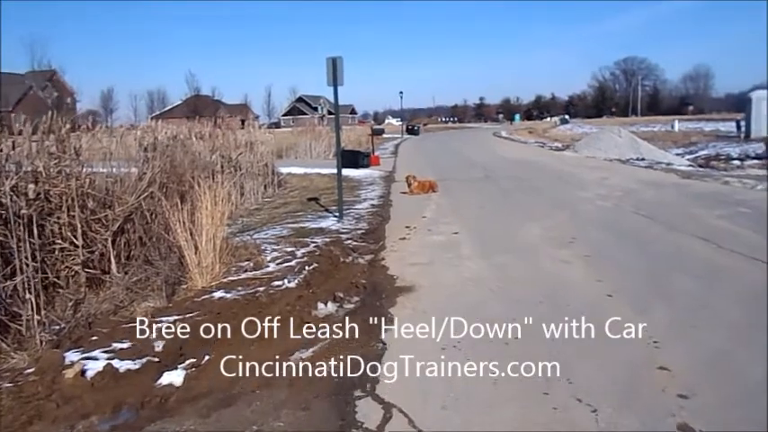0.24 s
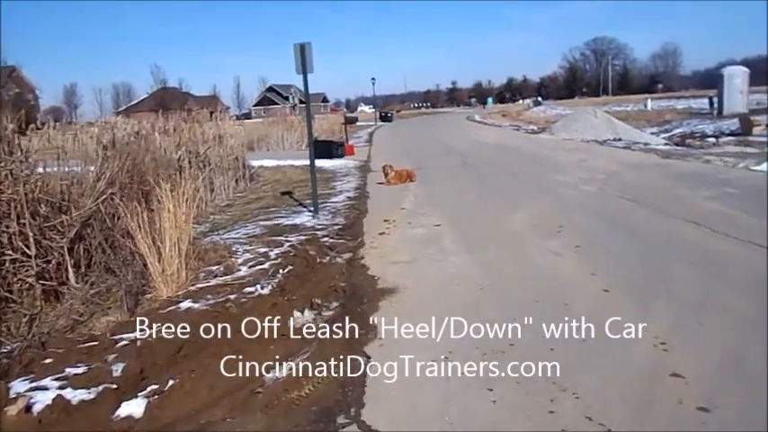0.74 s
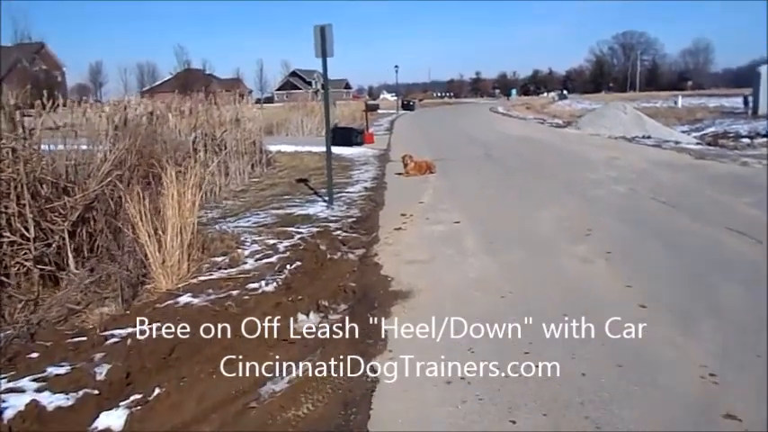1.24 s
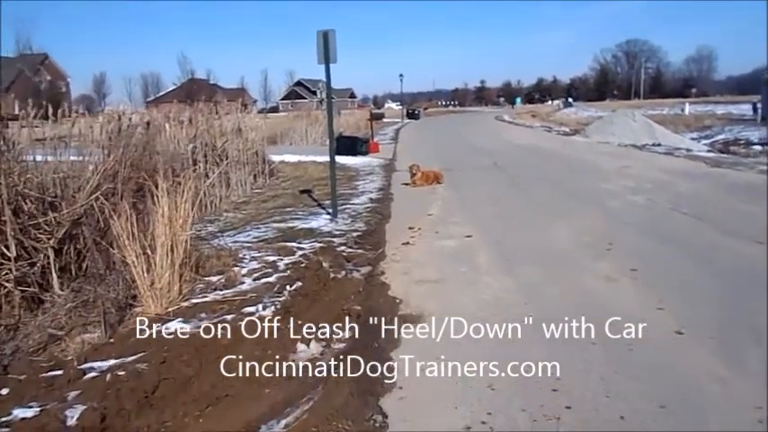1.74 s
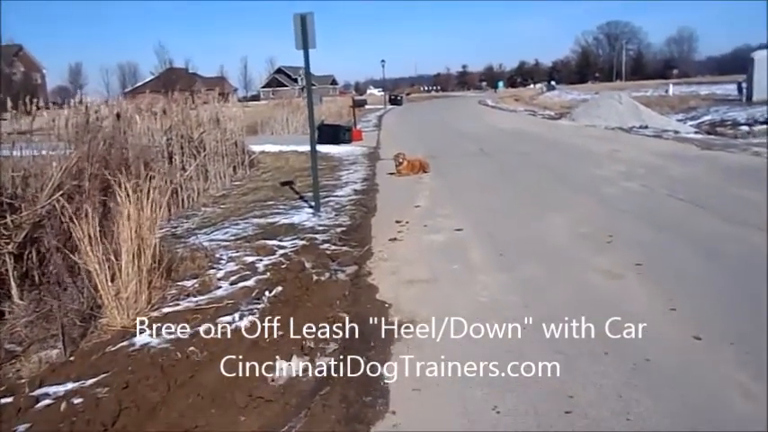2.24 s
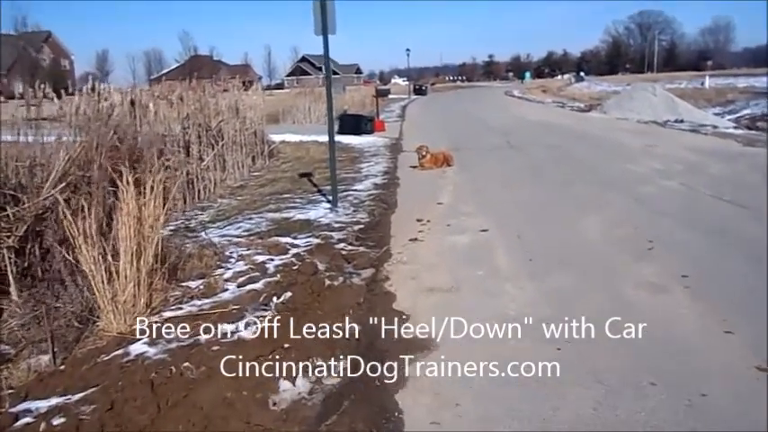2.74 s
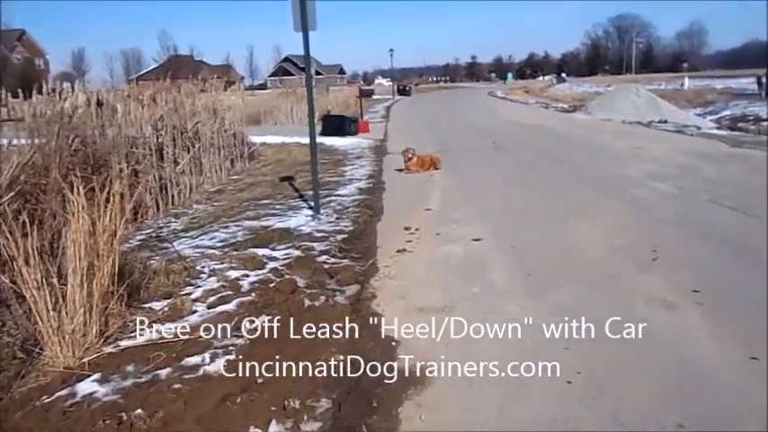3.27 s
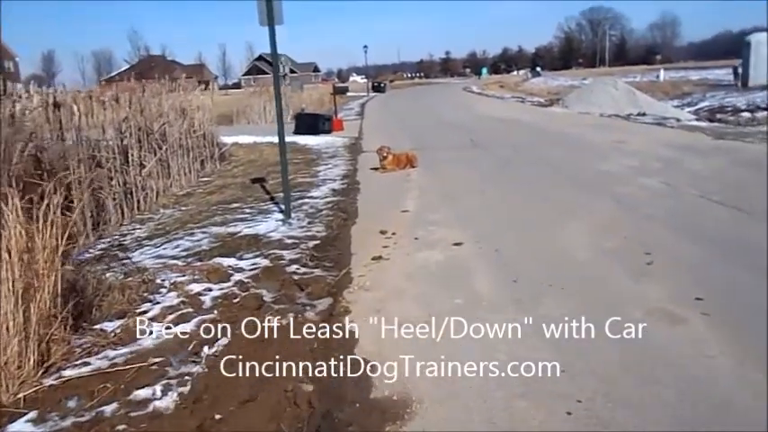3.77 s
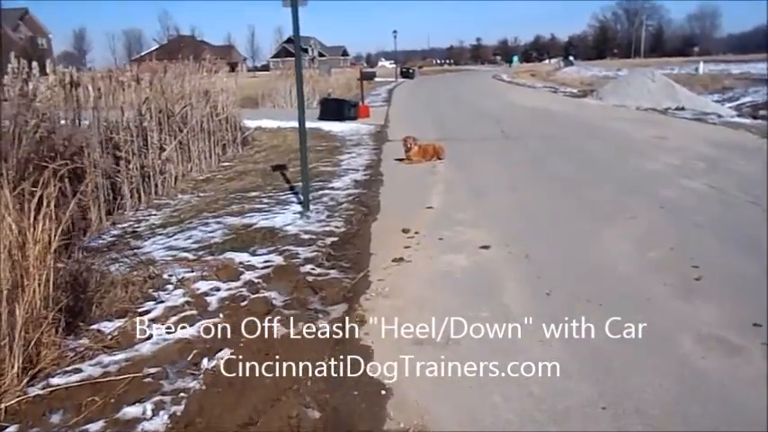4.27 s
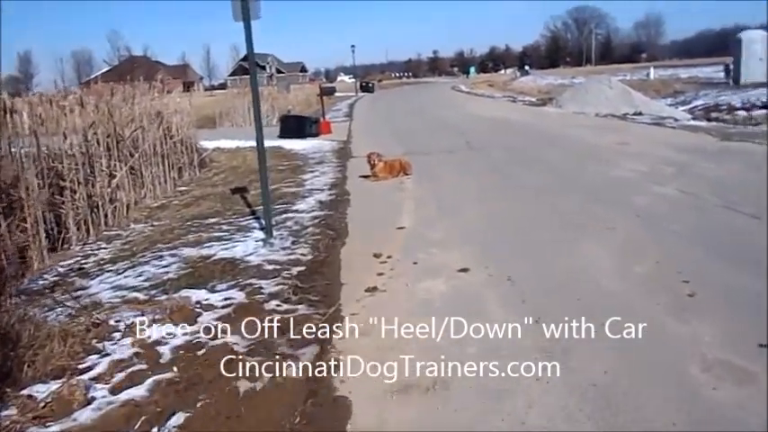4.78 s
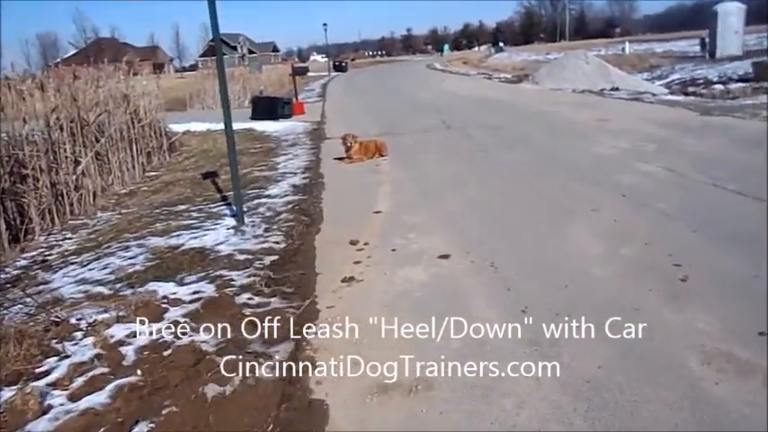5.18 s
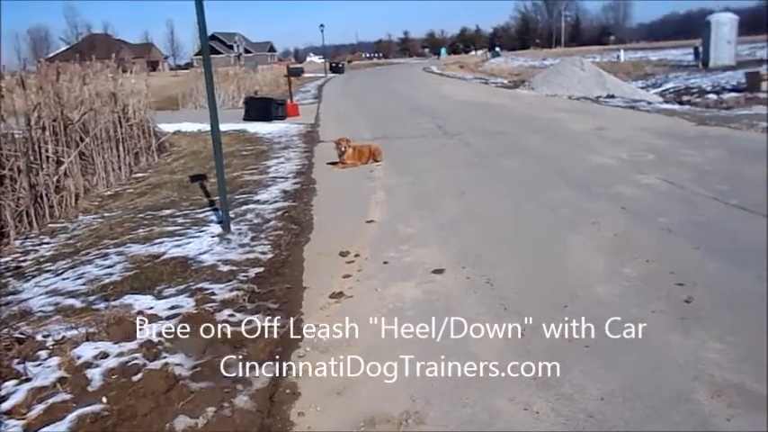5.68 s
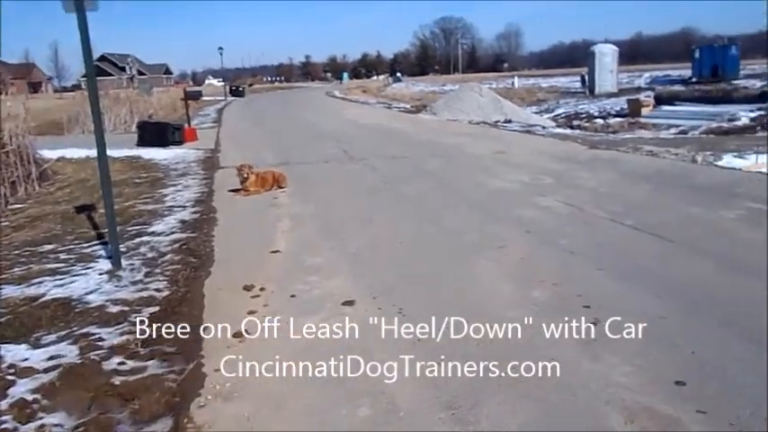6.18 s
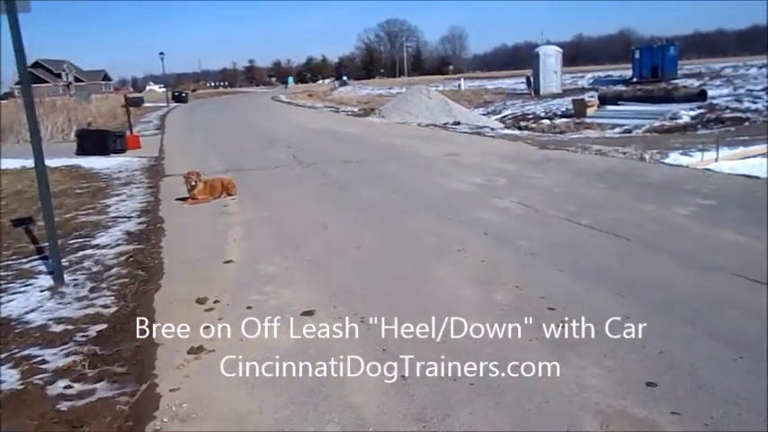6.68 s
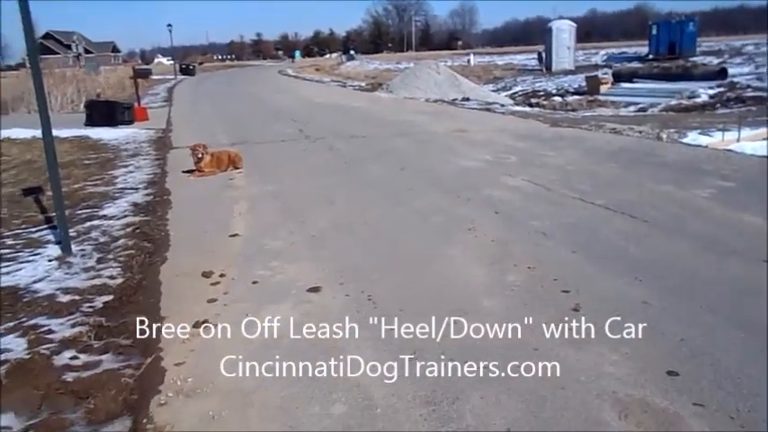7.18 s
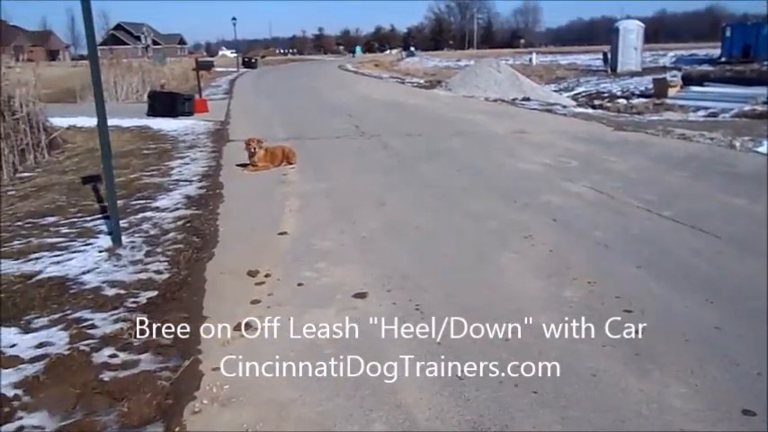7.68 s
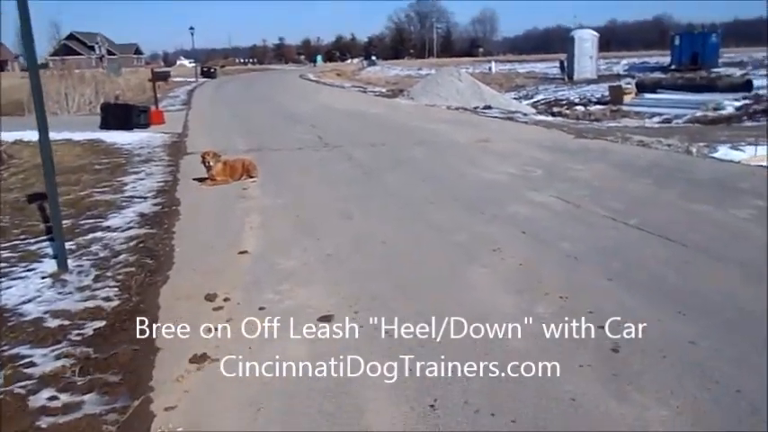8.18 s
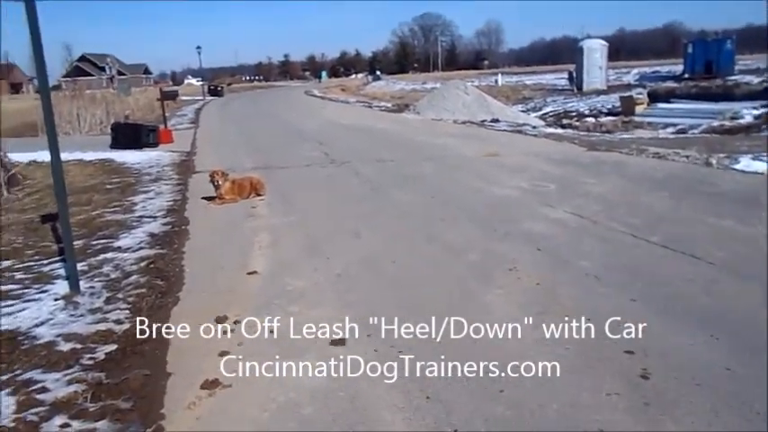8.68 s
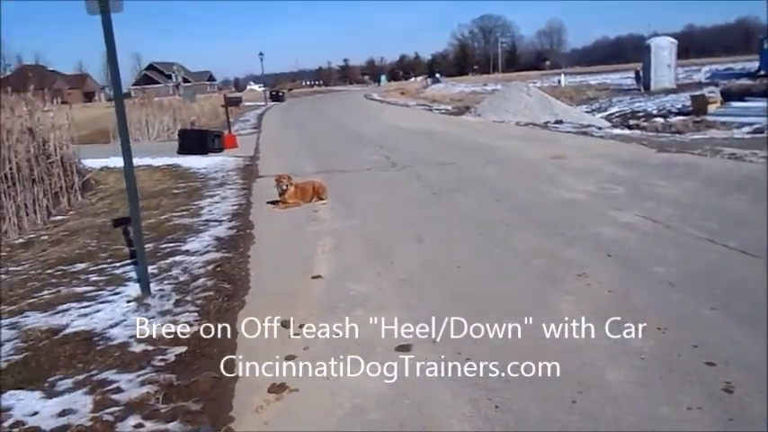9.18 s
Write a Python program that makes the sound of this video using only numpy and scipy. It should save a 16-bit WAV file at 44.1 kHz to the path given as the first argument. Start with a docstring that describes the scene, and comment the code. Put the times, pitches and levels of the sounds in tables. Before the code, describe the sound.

Outdoors on an open country road, a car's soft tyre roar recedes over steady airy wash and two low, throbbing engine hums far off. Close to a small, slightly dull microphone, someone shuffles slowly on gritty asphalt: irregular scrapes, dull sole thuds and sharp pebble snaps. A tiny bird whistle comes past the middle, then the heaviest step lands near eight seconds.

```python
"""A road in open country: a car rolls away, its tyre roar fading over a steady wash of air, while
two far engines hum and beat against each other. Close by, the holder of a small camera shuffles
slowly over gritty asphalt: grit grinds as noise grains, the sole thuds and single stones snap as
short rings. Later a bird gives one faint whistle, a rising sine. A small microphone hears it all."""
import sys
import numpy as np
from scipy import signal
from scipy.io import wavfile
from scipy.ndimage import uniform_filter1d

SR = 44100
rng = np.random.default_rng(int(sys.argv[2]) if len(sys.argv) > 2 else 0)


def digitize_waveform(pressure):
    """Quantize a signal to 16-bit integers and store it at the path in sys.argv[1].

    Rows of a 2-D input are taken as channels; values are limited to [-1, 1].
    """
    field = np.atleast_2d(pressure).T
    bounded = np.clip(field, -1, 1)
    quanta = np.round(bounded * 32767).astype(np.int16)
    wavfile.write(sys.argv[1], SR, quanta)


N = 415457  # samples

# short slides of the sole over loose grit: middle t/s, nominal length t/s, peak level/dB, fineness (0-1)
SLIDES = [(0.364, 0.08, -56, 0.4), (1.033, 0.024, -30.5, 0.01), (1.066, 0.021, -39.5, 0.1),
          (1.1, 0.05, -44.5, 0), (1.724, 0.03, -50.5, 0.6), (1.844, 0.13, -57, 0), (2.452, 0.024, -32, 0.6),
          (2.492, 0.086, -48, 0.45), (3.08, 0.039, -55, 0.6), (3.229, 0.16, -51.5, 0.04),
          (3.351, 0.053, -54.5, 0.1), (3.848, 0.025, -47.5, 0.3), (3.898, 0.044, -44.5, 0.04),
          (3.945, 0.052, -50, 0), (4.015, 0.044, -46, 0), (4.743, 0.098, -65, 0.3),
          (5.236, 0.037, -46, 0.02), (5.344, 0.088, -39.5, 0.04), (6.618, 0.14, -56, 0.2),
          (6.918, 0.035, -51, 0.9), (6.968, 0.035, -54, 1.0), (7.326, 0.014, -40, 0.9),
          (7.361, 0.022, -38, 0.4), (7.407, 0.046, -44, 0.3), (7.996, 0.061, -38, 0.06),
          (8.061, 0.058, -44.5, 0), (8.257, 0.048, -51.5, 0.76), (8.438, 0.033, -56, 0.5),
          (8.501, 0.023, -55.5, 1), (8.616, 0.015, -53, 0.1), (8.654, 0.031, -57, 0.3),
          (8.711, 0.019, -51, 1.0), (8.855, 0.035, -54.5, 1)]
# colour of the coarse grit, also of the stone debris: f/Hz, relative level per Hz/dB
COARSE_COLOUR = [(300, -23.5), (700, 0.5), (1300, 2.5), (2200, -1.5), (3400, 2.5), (5500, -2),
                 (6500, -20.5), (7100, -30), (11000, -29)]


def amp(db):
    """Amplitude for a level in dB."""
    return 10 ** (np.asarray(db) / 20)


def evened(x):
    """Bring a signal to an rms of 1."""
    return x / np.sqrt(np.mean(x ** 2) + 1e-20)


def spectrum(points, hz):
    """Amplitude at each frequency, drawn between (f/Hz, level/dB) points on a log frequency axis."""
    f, db = np.transpose(points)
    return amp(np.interp(np.log(hz + 1), np.log(f + 1), db))


def add(mix, s, sound):
    """Lay a sound into the mix from s seconds on, cut at the end of the mix."""
    part = mix[round(s * SR):][:len(sound)]
    part += sound[:len(part)]


def wash(points, patchy_db):
    """Noise of a given colour whose level drifts in patches over time and frequency."""
    frames, hz = N // 512 + 5, np.fft.rfftfreq(2048, 1 / SR)
    real, imaginary, patches = rng.standard_normal((frames, 1025, 3)).T
    patches = uniform_filter1d(patches, size=16, axis=0)  # smooth over frequency
    patches = evened(uniform_filter1d(patches, size=6, axis=1))  # smooth over time
    level = spectrum(points, hz)[:, None] * amp(patchy_db * patches)
    noise = signal.istft((real + 1j * imaginary) * level, nperseg=2048, noverlap=1536)[1]
    return evened(noise[:N])


def coloured(x, points):
    """Causal, minimum-phase colour, so that clicks keep a sharp front."""
    log_gain = np.log(spectrum(points, abs(np.fft.fftfreq(4096, 1 / SR))))
    response = np.exp(np.conj(signal.hilbert(log_gain)))
    taps = np.fft.ifft(response).real[:1024]
    return signal.oaconvolve(x, taps)[:len(x)]


def blurred(hz, width, steady):
    """A tone whose level and phase wander within a band of width Hz, around a steady share."""
    decay = np.exp(-np.pi * width / SR)
    real, imaginary = rng.standard_normal((N, 2)).T
    wander = signal.lfilter([1], [1, -decay], real + 1j * imaginary)
    wander /= np.sqrt(np.mean(abs(wander) ** 2))
    carrier = np.exp(2j * np.pi * np.cumsum(hz * np.ones(N)) / SR)
    return evened((carrier * (steady + wander)).real)


def ring(hz, db, cycles, turn, lead):
    """A quick rise and a dying ring of a few cycles, its peak near lead seconds."""
    u = np.maximum((np.arange(2400) / SR - lead) * hz / cycles + 0.57, 0)
    shape = (1 - np.exp(-2.2 * u)) ** 2 * np.exp(-1.3 * u)
    return amp(db) * shape / shape.max() * np.cos(2 * np.pi * (cycles * u + turn))


def road():
    """Tyre roar falling as 1/distance while the car rolls away, over the steady wash of open country."""
    # colours of the tyres and of the open country: f/Hz, relative level per Hz/dB
    tyre_colour = [(24, -72), (40, -24), (100, -10.5), (209, -1), (405, -14.5), (500, -23.5), (822, -14),
                   (1520, -13.5), (2320, -26), (2940, -22.5), (6880, -52.5), (11300, -57), (14700, -91),
                   (22000, -120)]
    air_colour = [(20, -39), (40, -10.5), (80, -3), (230, -2.5), (400, -6), (800, -15), (1200, -11),
                  (1900, -24), (2400, -22), (2950, -19.5), (4400, -30.5), (5500, -27.5), (6400, -35.5),
                  (7000, -59), (11000, -49)]
    start_m, speed_m_per_s = 26.3, 10.2
    car_db, air_db = -39, -45.5  # rms; the car's at its starting distance
    distance_m = start_m + speed_m_per_s * np.arange(N) / SR
    car = amp(car_db) * start_m / distance_m
    return car * wash(tyre_colour, patchy_db=1.0) + amp(air_db) * wash(air_colour, patchy_db=1.0)


def engine():
    """The lowest firing orders of two engines, blurred by distance and moving air, and a faint whine."""
    # far engine that hunts a little and settles, its firing rate: t/s, f/Hz
    firing_rate = [(0, 61.5), (1.2, 61), (1.8, 57.4), (2.4, 58.2), (3, 59.6), (3.5, 57.4), (4.05, 58.6),
                   (4.6, 56.3), (7.3, 55.6), (9.42, 56.2)]
    # firing orders of the hunting and of the steady engine: multiple, rms level/dB, blur f/Hz
    hum_orders = [(1, -62, 1.0), (2, -59, 2.2), (3, -52, 2.1)]
    drone_orders = [(2, -58, 2.0), (3, -53, 2.7)]
    steady_hz = 58.5  # firing rate of the second engine
    whine_hz, whine_width_hz, whine_db = 1132, 21, -58.5
    hz = np.interp(np.arange(N) / SR, *np.transpose(firing_rate))
    hum = sum(amp(db) * blurred(k * hz, width, steady=1.76) for k, db, width in hum_orders)
    drone = sum(amp(db) * blurred(k * steady_hz, width, steady=1.4) for k, db, width in drone_orders)
    whine = amp(whine_db) * blurred(whine_hz, whine_width_hz, steady=0)
    return hum + drone + whine


def slide(size):
    """Level of one slide: it bites quickly and eases off slowly."""
    return np.sin(np.pi * np.linspace(0, 1, size) ** 0.64) ** 2


def grit():
    """Many small grains of very unequal size over a sandy hiss, swelling with each slide."""
    # colour of the finest grit: f/Hz, relative level per Hz/dB
    sand_colour = [(1500, -27), (3000, -16), (4200, -1), (5700, 5.5), (6500, -20), (7100, -15),
                   (11000, -20.5)]
    loose_db = -63  # coarse grit that keeps shifting between the slides
    coarse, fine = np.full(N, amp(loose_db)), np.zeros(N)
    for s, length, db, fineness in SLIDES:
        swell = amp(db) * slide(round(1.49 * length * SR))
        fineness = np.clip(fineness, 0, 1)
        add(coarse, s - 0.63 * length, np.sqrt(1 - fineness) * swell)
        add(fine, s - 0.67 * length, np.sqrt(fineness) * swell)
    when, size, sign, hiss = rng.random((N, 4)).T
    struck = when < 1200 / SR  # 1200 grains per second on average
    grains = struck * amp(-3.0 * np.log(1 - size + 0.003)) * np.sign(sign - .5)
    rub = evened(grains) + 0.4 * (hiss - .5)
    # the fine grit takes the same rub backwards
    coarse_rub, fine_rub = coloured(rub, COARSE_COLOUR), coloured(rub[::-1], sand_colour)
    return coarse * evened(coarse_rub) + fine * evened(fine_rub)


def thuds():
    """Soft pushes and short rings of the sole as weight lands on it or drags it."""
    # thuds of the sole: t/s, f/Hz, peak level/dB, length in cycles
    thud_rows = [(.25, 825, -31, 3.7), (0.26, 179.3, -29, 4.14), (2.453, 352, -30, 1.13),
                 (2.465, 470, -27.5, 1.4), (5.245, 450, -32.5, 1.4), (5.339, 534, -32, 1.27),
                 (7.968, 480, -17.5, 0.83), (7.974, 300, -18.5, 0.92), (7.995, 416, -28.5, 1.8),
                 (8.044, 410, -37, 0.9), (8.222, 1517, -40, 6.5), (8.26, 1515, -42.5, 13)]
    out, lead = np.zeros(N), 15e-3  # s
    for (s, hz, db, cycles), turn in zip(thud_rows, rng.random(len(thud_rows))):
        add(out, s - lead, ring(hz, db, cycles, turn, lead))
    return out


def chips():
    """Small chips snap at random inside each slide: louder in a hard slide, higher in fine grit."""
    most, per_s = 12, 70  # most chips in one slide; mean rate over its nominal length
    base_db, follow, spread_db, knock_db = -34, .4, 10, -7  # follow: dB per dB of slide level
    crack_hz, fine_hz, crack_spread_hz = 4000, 900, 1500
    sole_hz, sole_spread_hz = 1250, 1100
    s, length, db, fineness = np.transpose(SLIDES)[:, :, None]
    draws = rng.random((len(SLIDES), most, 5))
    kept, when, size, pitch, place = np.moveaxis(draws, 2, 0)
    crack_db = base_db + follow * (db - np.mean(db)) + spread_db * (size - .5)
    # same columns as the clear snaps
    rows = np.array([s + length * (when - .5),
                     sole_hz + sole_spread_hz * (place - .5),
                     crack_db + knock_db,
                     crack_hz + fine_hz * fineness + crack_spread_hz * (pitch - .5),
                     crack_db])
    return list(rows[:, kept < per_s * length / most].T)


def stones():
    """Each snap knocks the sole, cracks the stone in two partials, and scatters a short spray of debris."""
    # stones that snap clearly, levels ahead of the partials' offsets and the body colour:
    # t/s, sole knock f/Hz, knock level/dB, stone crack f/Hz, crack level/dB
    snap_rows = [(0.3901, 1010, -15.5, 3240, -21.5), (0.6657, 1570, -27.5, 3970, -28.5),
                 (1.0294, 1320, -19, 4200, -19), (1.0643, 1180, -26, 3400, -15),
                 (1.0993, 1390, -26, 3430, -11), (1.1112, 1610, -22, 3300, -20),
                 (1.1387, 1410, -13, 4800, -19), (1.1674, 1450, -4, 3430, -12),
                 (1.2434, 1190, -25.5, 5000, -28.5), (1.7325, 1290, -36, 4460, -22.5),
                 (1.745, 1360, -34, 4800, -29.5), (1.8341, 1290, -22, 4040, -27),
                 (1.8541, 1230, -31, 4460, -31), (1.9964, 1250, -9, 3650, -14.5),
                 (2.031, 1430, -33, 5400, -34), (2.266, 1610, -28, 3330, -31),
                 (2.4422, 1590, -24, 4300, -15), (2.446, 1530, -34, 4600, -9),
                 (2.4545, 1580, -18, 3700, -18), (2.4648, 1540, -14, 3320, -15),
                 (2.469, 1220, -42, 3720, -18), (2.6004, 1370, -22, 4100, -19.5),
                 (2.6416, 1070, -46, 4570, -23), (2.7075, 1470, -30, 4500, -29.5),
                 (3.0789, 1420, -25, 3100, -28.5), (3.2026, 1740, -27, 3410, -36),
                 (3.229, 1130, -27, 3440, -29), (3.2576, 1330, -19, 3530, -29),
                 (3.2679, 1480, -22, 4380, -34), (3.286, 1430, -32, 5180, -30),
                 (3.3488, 1288, -27, 4870, -34), (3.4485, 1470, -29.5, 4750, -27.5),
                 (3.6831, 1400, -32, 5090, -35.5), (3.8447, 1010, -26, 3160, -28.5),
                 (3.8995, 850, -22.5, 3420, -30), (3.928, 1400, -30, 4200, -28),
                 (3.9406, 1220, -21, 3740, -30), (3.9511, 1305, -22.5, 3140, -13),
                 (3.958, 1750, -26, 3540, -24), (4.006, 1456, -14.5, 3220, -8),
                 (4.0129, 1800, -32, 3580, -15.5), (4.327, 1540, -30, 3420, -37),
                 (4.4821, 1170, -26, 2940, -22.5), (4.6308, 883, -18, 3520, -15.5),
                 (4.7451, 1250, -40, 4200, -24), (4.8339, 867, -49, 4770, -32),
                 (5.2263, 1170, -34, 3300, -24), (5.247, 1040, -25, 3230, -40),
                 (5.2831, 1550, -40, 4170, -26.5), (5.3325, 1340, -40, 4410, -19),
                 (5.3396, 1900, -10, 3160, -4.5), (5.3495, 1510, -40, 4200, -16),
                 (5.3624, 1110, -23, 4160, -18), (5.384, 1200, -30, 3920, -23.5),
                 (5.4002, 1470, -24, 4600, -25), (5.5, 1390, -31, 4740, -27), (5.9957, 996, -41, 4850, -36),
                 (6.1419, 980, -26, 3330, -35), (6.2402, 990, -24, 3430, -34),
                 (6.4368, 1410, -39, 4790, -36), (6.5149, 1570, -30, 4550, -24.5),
                 (6.6177, 1620, -32, 5300, -18), (6.6326, 1450, -24.5, 4800, -20.5),
                 (6.8035, 1080, -32, 4970, -30), (6.8377, 1390, -26, 3840, -34),
                 (6.8593, 1590, -27, 5220, -20.5), (6.9233, 899, -48, 4770, -30),
                 (6.93, 1060, -50, 4900, -30), (7.322, 1050, -46, 4020, -22),
                 (7.325, 1310, -46, 4350, -13.5), (7.3324, 1340, -19.5, 3600, -7.5),
                 (7.3364, 1310, -45, 4170, -11.5), (7.357, 1670, -38, 4330, -6.5),
                 (7.3635, 1460, -42, 3980, -26), (7.3656, 1580, -26, 4000, -6),
                 (7.4013, 1200, -22, 3690, -22.5), (7.9665, 975, -14, 5170, -12),
                 (7.9695, 630, -13, 4100, -21), (7.9749, 680, -10, 3270, -9), (7.9773, 830, -7, 3680, -5),
                 (7.9907, 1140, -19.5, 3890, -20), (7.9967, 840, -25, 3750, -35),
                 (8.0194, 1010, -19.5, 3080, -33), (8.031, 1280, -19, 3640, -30),
                 (8.0448, 1110, -10.5, 4000, -8), (8.0612, 1480, -15.5, 3900, -13.5),
                 (8.0805, 1460, -32, 3490, -32), (8.1818, 1570, -24, 5070, -33),
                 (8.2009, 1420, -37, 4260, -27.5), (8.3292, 1900, -20, 4230, -19.5),
                 (8.4375, 970, -55, 4350, -31), (8.449, 1204, -49, 3900, -37),
                 (8.7137, 916, -45, 4525, -34.5), (9.1669, 1200, -40, 3730, -30)]
    # the camera body colours sharp fronts, three broad humps, then a dull top: f/Hz, gain/dB
    body_colour = [(1500, -2), (2200, -4), (3100, -2), (4400, -7), (5700, -2.5), (7100, -14), (11000, -14)]
    out, spray, t = np.zeros(N), np.zeros(N), np.arange(600) / SR
    snaps, lead = snap_rows + chips(), 2e-3  # lead in s
    chance = rng.random((len(snaps), 4))
    for (s, knock_hz, knock_db, crack_hz, crack_db), (p, q, r, spread) in zip(snaps, chance):
        upper_hz = 5000 + 1100 * spread
        knock = ring(knock_hz, knock_db, 0.99, p, lead)
        crack = ring(crack_hz, crack_db + 2.5, 1.43, q, lead) + ring(upper_hz, crack_db - 10, 2.41, r, lead)
        add(out, s - lead, knock + crack)
        add(spray, s, amp(crack_db - 19.0 - 60 * t / 0.026))  # falls at 60 dB per 26 ms
    debris = evened(coloured(rng.standard_normal(N), COARSE_COLOUR))
    return coloured(out, body_colour) + spray * debris


def bird():
    """One thin whistle: a sine that climbs quickly, then levels off as it fades."""
    start_s, length_s, edge_s = 5.765, .2, .025
    level_db, fade_db = -55.5, -12  # peak amplitude ahead of the fade; change by the end
    top_hz, climb_hz, climb_s = 3990, 360, .05
    t = np.arange(0, length_s, 1 / SR)
    hz = top_hz - climb_hz * np.exp(-t / climb_s)
    edges = np.minimum(np.minimum(t, length_s - t) / edge_s, 1)
    level = edges * amp(level_db + fade_db * t / length_s)
    out = np.zeros(N)
    add(out, start_s, level * np.sin(2 * np.pi * np.cumsum(hz) / SR))
    return out


def scene():
    """Road, far engines, shuffling sole and bird, summed to one channel."""
    return (road() + engine() + grit() + thuds() + stones() + bird())[None]


def record(dry):
    """The small microphone drops the deepest bass; then a steep low-pass limits the band."""
    bass_cut = signal.butter(3, 42, "high", fs=SR, output="sos")
    thin = signal.sosfilt(bass_cut, dry)
    band_limit = signal.firwin(511, 11050, window=("kaiser", 9), fs=SR)  # edge in Hz
    return signal.oaconvolve(thin, band_limit[None], "same")


dry = scene()
out = record(dry)
digitize_waveform(out)
```